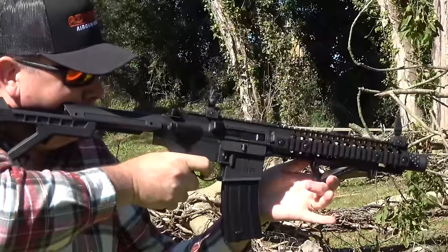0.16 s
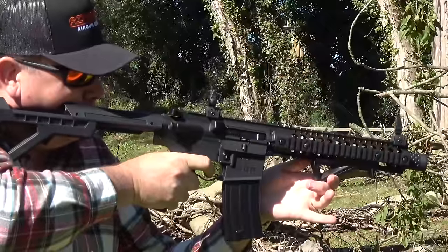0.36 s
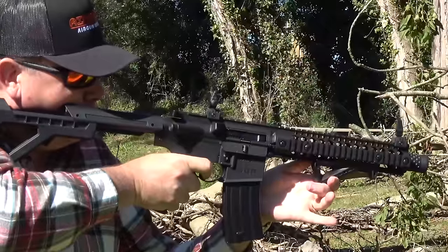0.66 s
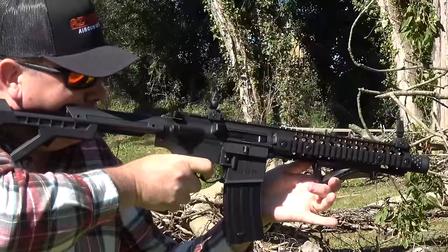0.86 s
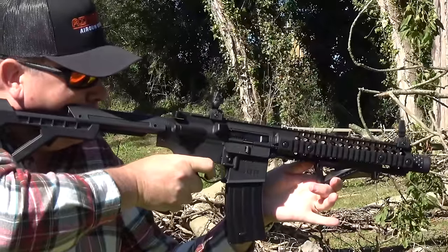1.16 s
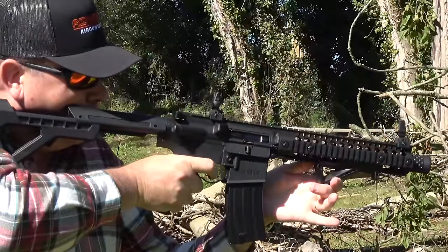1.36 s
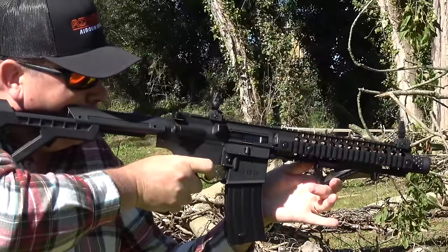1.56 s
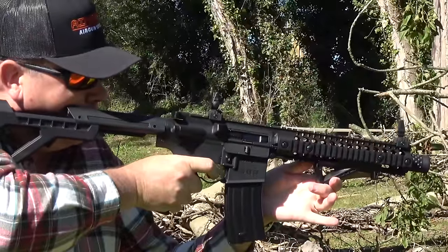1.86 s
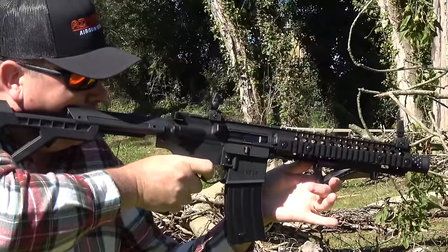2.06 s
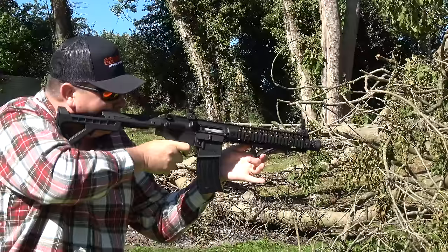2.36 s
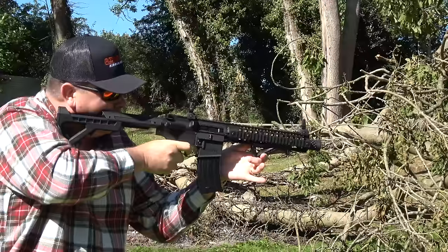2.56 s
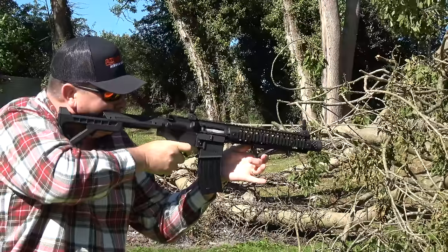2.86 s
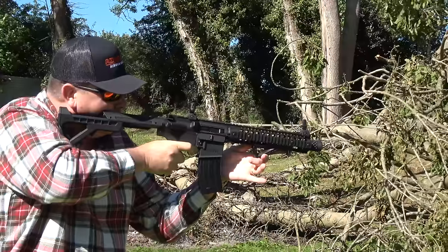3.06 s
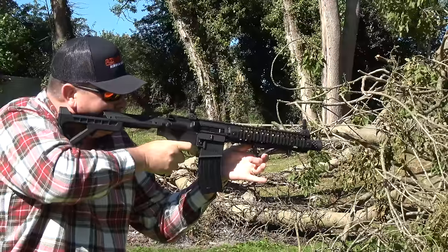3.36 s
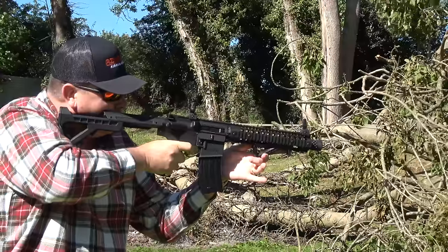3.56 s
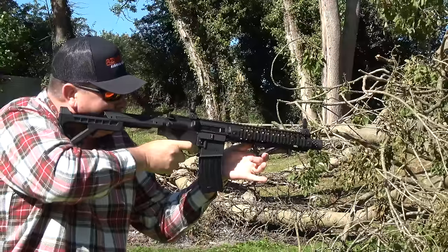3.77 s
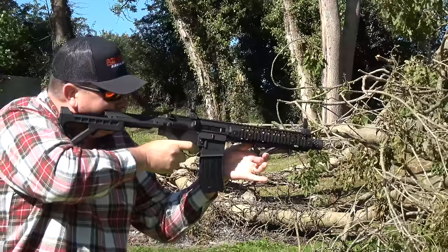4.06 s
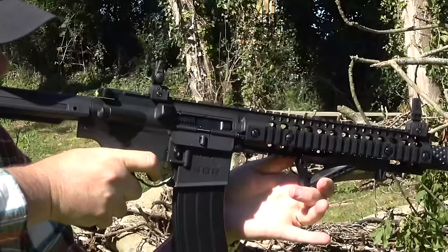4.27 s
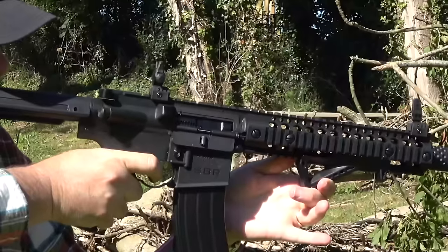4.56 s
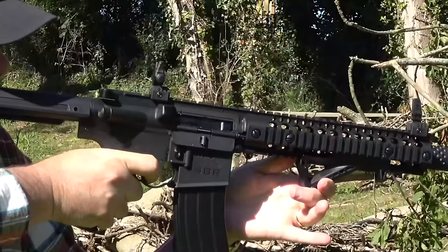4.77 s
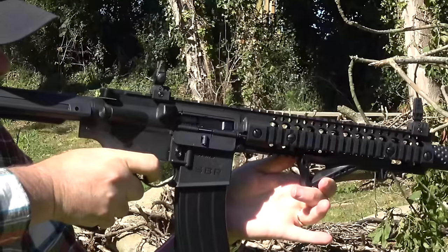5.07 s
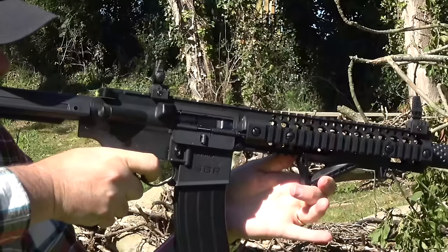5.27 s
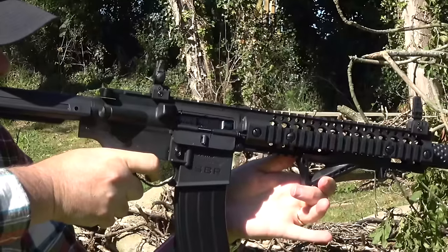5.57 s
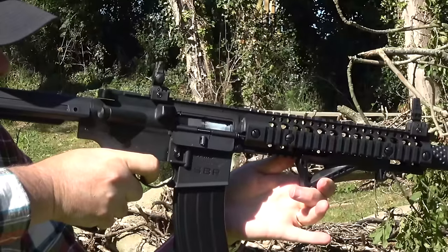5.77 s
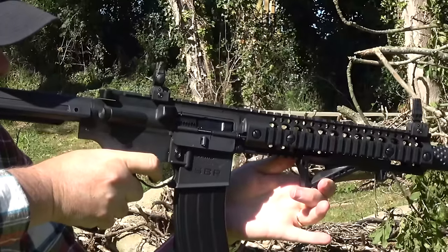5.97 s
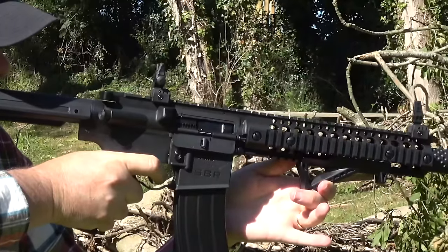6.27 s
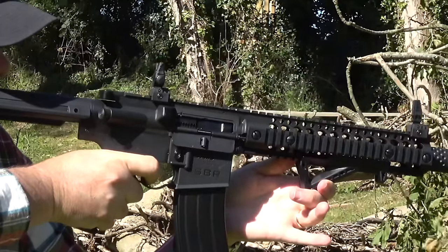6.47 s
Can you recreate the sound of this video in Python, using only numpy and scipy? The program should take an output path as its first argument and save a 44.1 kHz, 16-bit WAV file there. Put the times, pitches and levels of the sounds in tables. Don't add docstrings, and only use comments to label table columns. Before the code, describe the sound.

Twenty rapid semi-automatic shots from a gas-powered pellet rifle outdoors, sharp close cracks with metallic bolt clatter and trigger ticks, over a light breeze.

```python
import sys
import numpy as np
from scipy import signal
from scipy.fft import rfft, irfft, next_fast_len
from scipy.io import wavfile
from scipy.ndimage import uniform_filter1d, map_coordinates

SR = 44100
rng = np.random.default_rng(int(sys.argv[2]) if len(sys.argv) > 2 else 0)


def gain_from_db(level_db):
    decades = np.asarray(level_db, float) / 20
    return 10 ** decades


def persist_wave(psi):
    counts = np.round(np.clip(psi, -1, 1) * 32767).astype(np.int16)
    wavfile.write(sys.argv[1], SR, np.atleast_2d(counts).T)


N = 292383

# [blast t/s, blast level/dB, crack level/dB, spring ring level/dB, barrel ring level/dB]
SHOTS = [(.098, -4, 0, -35, -53), (.6826, -2.5, 3, -34.5, -53.5), (1.0017, -5, -2.5, -36, -42),
         (1.3306, -3.5, .5, -32, -52), (1.7346, -5, -.5, -37, -59.5), (2.1139, -3, 2, -31.5, -56),
         (2.4534, -5.5, 2, -33, -41), (2.717, -3.5, .5, -35, -47), (2.9497, -5, -3, -32.5, -50),
         (3.2942, -5.5, 1.5, -34.5, -57), (3.5987, -4, -3, -40, -44), (3.9672, -2.5, -.5, -33.5, -42.5),
         (4.5087, -6, -5.5, -33.5, -52), (4.8103, -5.5, 2, -35, -42), (5.0767, -6, -2.5, -37, -43),
         (5.3255, -7, -5.5, -42, -45), (5.5723, -8, 0, -40.5, -60), (5.8433, -5, 2, -36, -49.5),
         (6.1555, -7.5, -.5, -38.5, -39.5), (6.5047, -6, -2, -37.5, -36)]


def blast():
    ms = np.arange(SR // 20) / SR * 1000 - 4

    def bump(at, width):
        return np.exp(-((ms - at) / width) ** 2)

    swing = 1.55 * bump(0, 0.39) - 0.66 * bump(-0.51, 0.48) - 0.79 * bump(-1.3, 0.12) - 0.19 * bump(1.92, 0.89)
    shroud_fade = 0.17 * np.exp(-np.maximum(ms - 2.4, 0) / 5.3) * (ms > 2.0)
    shroud = shroud_fade * np.cos(2 * np.pi * (ms - 2.4) / 1.8)
    ground = 0.087 * bump(8.5, 1.2) - .1 * bump(4.0, 0.19)
    trunk_echo = 0.024 * bump(3.3, 2.5) * np.sin(2 * np.pi * 0.705 * ms)
    out = np.zeros(N)
    for s, db, *_ in SHOTS:
        add(out, s - .004, gain_from_db(db + 3.0) * (swing + shroud + ground))
        add(out, s + .1185, gain_from_db(db + 1.5) * trunk_echo)
    return out


def action():
    kinds = contacts()
    blows, struck = clacks(kinds)
    stock = gain_from_db(-15) * uniform_filter1d(blows, size=90, origin=40) * hollow()
    return gain_from_db(-1.8) * struck + loose_buzz(blows) + stock + steel_rings(kinds) + bolt_rings()


# [strike t/s, strike level/dB, knock t/s, knock level/dB, input sag level/dB]
HAMMER = [(0.079, -5, 0.0871, -7, -10), (0.6653, -3, 0.6731, -11, -21.5), (0.9823, -3, 0.9905, -6, -19),
          (1.3117, -4, 1.3202, -7, -17), (1.7162, -3, 1.724, -9, -27), (2.095, -4, 2.1031, -6, -27),
          (2.4333, -3, 2.4414, -6, -19.5), (2.6981, -4, 2.7065, -9, -27), (2.9311, -3, 2.9394, -7, -27),
          (3.2755, -3, 3.2845, -8, -27), (3.58, -3, 3.5883, -9, -27), (3.9485, -3, 3.9555, -9, -17),
          (4.4901, -4, 4.498, -9, -16.5), (4.7906, -4, 4.7987, -5, -27), (5.0577, -3, 5.0654, -9, -16),
          (5.3065, -3, 5.3148, -8, -27), (5.5528, -3, 5.561, -6, -16.5), (5.8244, -4, 5.8327, -9, -27),
          (6.137, -4, 6.1451, -7, -27), (6.4866, -3, 6.4951, -13, -27)]
# [t/s, level/dB, rebound level/dB, input sag level/dB]
BOLT_BACK = [(.1124, -1, -13, -11.5), (.698, .5, -16, -14), (1.0167, -2.5, -9, -10), (1.346, 1.5, -16, -14),
             (1.752, -1, -11, -13), (2.131, 0, -16, -9.5), (2.4688, -5.5, -2.5, -27), (2.7342, -1, -9, -27),
             (2.9681, -7, -16, -27), (3.3117, -6.5, -9, -27), (3.6177, -7, -1.5, -27),
             (3.9889, -7, -14, -27), (4.5205, -11, -14.5, -27), (4.83, -13, -18, -27),
             (5.0937, -10, -13, -27), (5.3422, -10, -8, -27), (5.588, -10.5, -10.5, -22),
             (5.8605, -13, -9.5, -24), (6.1678, -11, -16, -18), (6.526, -9, -13, -24)]
# [slam t/s, slam level/dB, bounce t/s, bounce level/dB, input sag level/dB]
BOLT_HOME = [(.1315, -7, .143, -6, -27), (.7169, -4.5, .7307, -9, -27), (1.0372, -2, 1.0495, -8, -27),
             (1.3659, -3.5, 1.3782, -7, -18.5), (1.7708, -2.5, 1.7829, -8.5, -27),
             (2.1503, -2, 2.1629, -7.5, -27), (2.4912, -3, 2.5025, -10.5, -27),
             (2.756, -3.5, 2.7692, -8, -27), (2.9899, -3.5, 3.0032, -11, -10),
             (3.3332, -2, 3.3473, -7, -12), (3.6386, -1, 3.6533, -13, -8.5), (4.008, -3, 4.0225, -8, -10.5),
             (4.5511, 1, 4.5637, -9.5, -12), (4.8519, .5, 4.8668, -7, -8.5), (5.119, 1, 5.1332, -9, -14.5),
             (5.3675, 2.5, 5.3819, -8.5, -13), (5.6132, 0, 5.6282, -5, -12),
             (5.8844, -1.5, 5.8994, -9, -10), (6.1964, -2, 6.2119, -6.5, -16),
             (6.5464, -2, 6.5615, -6.5, -13)]
# [t/s, level/dB]
LOOSE_PARTS = [(0.1093, -10), (0.1191, -7), (0.1227, -12), (0.6928, -15), (0.7063, -7), (1.0104, -13),
               (1.0238, -11), (1.3528, -9), (1.3562, -12), (1.7439, -13), (1.7471, -15), (1.7621, -13),
               (1.7644, -14), (2.1428, -14), (2.1651, -11), (2.4751, -11), (2.4851, -9), (2.7434, -15),
               (2.7479, -12), (2.7506, -10), (2.9589, -11), (2.9809, -7), (2.9831, -5), (2.9994, -14),
               (3.3032, -13), (3.3266, -9), (3.3308, -10), (3.6087, -15), (3.6301, -12), (3.6359, -11),
               (3.6468, -10), (3.9783, -14), (3.9837, -14), (3.9967, -13), (4.0039, -10), (4.016, -13),
               (4.5311, -15), (4.5336, -15), (4.536, -15), (4.5419, -11), (4.5614, -14), (4.8206, -13),
               (4.8259, -12), (4.8619, -15), (5.0863, -13), (5.1269, -14), (5.1295, -15), (5.3367, -11),
               (5.364, -14), (5.3756, -13), (5.583, -15), (5.6251, -14), (5.6312, -13), (5.8553, -13),
               (6.164, -14), (6.1787, -14), (6.19, -11), (6.2084, -12), (6.5172, -11), (6.5399, -7)]
# [t/s, level/dB]
SEAR_SCRAPES = [(0.0608, -13), (0.6395, -12), (0.6558, -12), (0.9636, -16), (0.967, -9), (0.9711, -10),
                (1.2948, -16), (1.2977, -8), (1.2998, -8), (1.703, -15), (1.707, -8), (1.7093, -13),
                (2.0803, -17), (2.0841, -9), (2.0885, -11), (2.4215, -16), (2.4248, -9), (2.4275, -11),
                (2.6847, -14), (2.6877, -8), (2.6907, -13), (2.9222, -9), (2.9259, -10), (3.2631, -16),
                (3.2667, -9), (3.2692, -10), (3.563, -17), (3.5663, -9), (3.5694, -12), (3.9394, -16),
                (3.9439, -4), (4.4696, -9), (4.4761, -9), (4.7794, -17), (4.783, -8), (4.7863, -12),
                (5.0477, -15), (5.0513, -9), (5.2954, -17), (5.3, -9), (5.541, -18), (5.5443, -9),
                (5.8112, -20), (5.816, -8), (6.1252, -19), (6.1289, -8), (6.4743, -21), (6.4813, -7)]
CHATTER_MS = dict(sear=2.8, strike=1.8, follow=2.4, crack=2.5, ground=1.6, back=3, rebound=2.2, home=4, bounce=3.8, loose=1.8)


def contacts():
    shot, _, crack_db, *_ = np.transpose(SHOTS)
    strike, strike_db, follow, follow_db, _ = np.transpose(HAMMER)
    back, back_db, rebound_db, _ = np.transpose(BOLT_BACK)
    home, home_db, bounce, bounce_db, _ = np.transpose(BOLT_HOME)
    cycle = dict(
        sear=np.transpose(SEAR_SCRAPES),
        strike=(strike, strike_db),
        follow=(follow, follow_db),
        crack=(shot - .0021, crack_db),
        ground=(shot + .0033, -10 + 0 * shot),
        back=(back, back_db),
        rebound=(back + .0042, rebound_db),
        home=(home, home_db),
        bounce=(bounce, bounce_db),
        loose=np.transpose(LOOSE_PARTS))
    return {name: np.c_[s, db, CHATTER_MS[name] + 0 * s] for name, (s, db) in cycle.items()}


# [f/Hz, level/dB over the receiver]
PART_TINTS = dict(sear=[(700, -8), (1500, 0), (4200, 0), (5800, -6), (7500, 1), (9000, -6), (10500, 1),
              (13800, -6)], strike=[(1500, 2), (2100, -4), (3800, 0), (4700, -6), (5400, 0), (6000, -4),
              (7000, 1), (14500, 6)], follow=[(1200, -7), (3000, -6), (4700, 5), (6300, -3), (7000, 3),
              (10000, -8), (14000, -7)], bolt=[(1000, 3), (2500, 1), (5000, -3), (6800, 1), (7500, -3),
              (10000, 1), (15500, 2)], home=[(1500, 0), (2600, -4), (3900, 3), (5500, -1), (6900, 3),
              (13500, 0), (15500, 5)], bounce=[(1000, 0), (2700, -8), (4500, 1), (5900, 3), (8800, -5),
              (9800, 1), (12300, -4)])


def clacks(kinds):
    noise = metal_noise(shell_db=4.5, patchy_db=2.2, grain_db=1.3)
    parts = {name: np.zeros(N) for name in PART_TINTS}
    for name, rows in kinds.items():
        part = name if name in PART_TINTS else "bolt"
        parts[part] += chatter(rows, rise_ms=0.31, fall_ms=0.65, lead_db=-22.5)
    struck = np.zeros(N)
    for name, envelope in parts.items():
        struck += filtered(envelope * noise, lambda f: gain_from_db(along(PART_TINTS[name], f)))
    return sum(parts.values()), struck


def loose_buzz(blows):
    driven = np.zeros(N)
    for (s, *_), (home, *_) in zip(SHOTS, BOLT_HOME):
        add(driven, s - .021, np.ones(round((home - s + .058) * SR)))
    t = np.arange(SR // 4) / SR
    decay = np.exp(-t / 0.0063) / (0.0077 * SR)
    shake = signal.fftconvolve(blows ** 2 * (driven + .05), decay)[:N]
    level = gain_from_db(-10.5) * np.sqrt(np.abs(shake)) * gain_from_db(2.25 * wobble(250))
    return level * metal_noise(shell_db=1, patchy_db=2.5, grain_db=2.0)


# [f/Hz, level/dB, t60/s]
STEEL_MODES = [(5949, -35, 0.061), (6930, -24.5, 0.041)]


def steel_rings(kinds):
    rings = np.zeros(N)
    for s, db, _ in np.concatenate(list(kinds.values())):
        for hz, mode_db, t60 in STEEL_MODES:
            louder, sharper = rng.normal(0, 1, 2)
            tone = ring(hz * (1 + 0.0086 * sharper), t60, .0005)
            add(rings, s, gain_from_db(db + mode_db + 5.3 * louder) * tone)
    for s, db, *_ in HAMMER:
        add(rings, s + .004, gain_from_db(db - 17) * ring(6985, .07, .003))
    return rings


# [t/s, level/dB]
HANDGUARD = [
    (0, -58),
    (4.1, -54),
    (4.3, -42),
]


def bolt_rings():
    t = np.arange(SR // 4) / SR
    squeeze = np.sin(2 * np.pi * np.cumsum(np.minimum(900 + 40000 * t, 1450)) / SR)
    squeeze *= t / .006 * np.exp(1 - t / .006)
    rings = np.zeros(N)
    for (s, *_, spring_db, barrel_db), (home, _, bounce, bounce_db, _) in zip(SHOTS, BOLT_HOME):
        guard_db = np.interp(s, *np.transpose(HANDGUARD))
        kept_db = 60 * np.minimum(t, home + .012 - s) / .12
        add(rings, s + .013, gain_from_db(spring_db + 14 + kept_db - kept_db[-1] / 2) * ring(981, 0.12, 0.0032))
        add(rings, s + .009, gain_from_db(-16) * squeeze)
        add(rings, s + .018, gain_from_db(guard_db + 15) * ring(1760, .08, .003))
        add(rings, home, gain_from_db(guard_db) * ring(1680, .3, .006))
        add(rings, bounce, gain_from_db(barrel_db + 11) * ring(3348, 0.12, .006))
        add(rings, bounce, gain_from_db(bounce_db - 14) * ring(5916, .06, .001))
    return rings


# [slack t/s, slack level/dB, click t/s, wall t/s]
PULLS = [(.56, -39, .548, .5756), (.9144, -29.5, .9294, .94), (1.2234, -45, 1.2494, 1.2636),
         (1.65, -55, 1.661, 1.6766), (1.9983, -42, 2.0298, 2.0477), (2.3702, -40, 2.3854, 2.397),
         (2.6498, -26, 2.6584, 2.6633), (2.884, -30, 2.8925, 2.9), (3.21, -55, 3.2217, 3.2383),
         (3.5212, -36, 3.5319, 3.5395), (3.851, -39, 3.899, 3.9133), (4.4091, -44, 4.399, 4.4228),
         (4.7343, -30, 4.7476, 4.7576), (5.0106, -29, 5.0214, 5.0273), (5.2588, -32, 5.2687, 5.277),
         (5.4977, -38, 5.5102, 5.5187), (5.7727, -35, 5.7827, 5.7907), (6.0734, -39, 6.088, 6.0997),
         (6.4282, -35, 6.441, 6.4517)]
# [wall level/dB, creep delay t/s, creep level/dB]
WALLS = [(-31, .012, -55), (-24, .011, -41), (-22, .016, -46), (-22, .015, -42), (-23, .016, -48),
         (-22, .013, -43), (-24, .01, -35), (-26, .009, -37), (-22, .013, -45), (-24, .011, -37),
         (-21, .014, -38), (-28, .012, -52), (-27, .01, -39), (-25, .01, -34), (-26, .009, -35),
         (-26, .01, -36), (-27, .011, -34), (-26, .013, -44), (-28, .012, -40)]
# [t/s, level/dB, sear ring level/dB]
RESETS = [(.2926, -18, 0), (.8586, -17, -6), (1.1281, -16.5, -3), (1.4687, -17.5, -3), (1.8801, -19.5, -3),
          (2.2538, -18.5, 3), (2.5815, -17, -3), (2.8208, -15, -3), (3.059, -16, -3), (3.4183, -14, 0),
          (3.7174, -14.5, -5), (4.1086, -17, -3), (4.6787, -15.5, -3), (4.9354, -15, -8), (5.2031, -16, -3),
          (5.4428, -15, -3), (5.692, -15.5, -3), (5.9833, -19.5, -3), (6.3051, -20.5, -10)]
# [t/s, level/dB, plastic knock level/dB]
FIDGET = [(.0315, -30, -19), (.0386, -8.5, -24), (.0436, -40, -11), (.0557, -25, -12), (.2566, -34, -14),
          (.4672, -42, -9), (.616, -62, 15), (.7475, -19, -15), (1.3975, -19, -15), (.6342, -36, -6),
          (.8072, -36, -8), (2.238, -31, -9), (2.846, -27, -17), (4.286, -43, -6)]


def trigger():
    slack, slack_db, click, wall = np.transpose(PULLS)
    wall_db, creep_s, creep_db = np.transpose(WALLS)
    reset, reset_db, _ = np.transpose(RESETS)
    click_db = -21 - .5 * 1000 * (wall - click)
    even = 0 * wall
    small = np.r_[np.c_[slack, slack_db, even - 7],
                  np.c_[click, click_db, even - 18],
                  np.c_[wall, wall_db, even - 2],
                  np.c_[wall + creep_s, creep_db, even - 3],
                  FIDGET]
    reset_knock_db = -27
    s, db, knock_db = np.r_[small, np.c_[reset, reset_db, reset_knock_db - reset_db]].T
    hold_ms = np.r_[np.full(len(small), 2.4), 5.5 + 0 * reset]
    ticks = gain_from_db(-5.5) * chatter(np.c_[s, db, hold_ms], rise_ms=.6, fall_ms=1.0, lead_db=-21.5)
    ticks *= metal_noise(shell_db=3.5, patchy_db=1.2, grain_db=1.5)
    settle = np.c_[reset + .011, reset_knock_db - 6.5 + 0 * reset, 3 + 0 * reset]
    knock_rows = np.r_[np.c_[s, db + knock_db, hold_ms], settle]
    knocks = chatter(knock_rows, rise_ms=.8, fall_ms=2.7, lead_db=-25.5) * hollow()
    thin = filtered(ticks + gain_from_db(-2.5) * knocks, lambda f: f ** 4 / (f ** 4 + 780. ** 4))
    return thin + sear_reset()


def sear_reset():
    sear, dip = np.zeros(N), np.zeros(N)
    for s, db, ring_db in RESETS:
        add(sear, s, gain_from_db(db + ring_db - 39) * ring(3990, .45, .004))
        add(sear, s, gain_from_db(db - 28) * ring(981, 0.13, 0.0037))
        add(dip, s + .004, -gain_from_db(db - 16) * np.hanning(round(.022 * SR)))
    return dip + sear * gain_from_db(3 * wobble(30))


# [f/Hz, level/dB per Hz]
RECEIVER = [(290, -28), (500, -5), (858, -6.5), (992, -2), (1310, 0), (2090, -12.5), (3960, -2),
            (4790, -3.5), (7000, -0.5), (8100, -3), (9240, -3), (12400, -3), (16300, -20.5)]
# [f/Hz, width f/Hz, level/dB]
RECEIVER_WALLS = [(4810, 370, -24), (6920, 260, 5.5), (7466, 750, -5.5), (9866, 480, 7), (12350, 300, -1.5)]


def metal_noise(shell_db, patchy_db, grain_db):
    walls = resonant(RECEIVER_WALLS)
    z = signal.stft(rng.standard_normal(N), nperseg=128)[2]
    field = uniform_filter1d(rng.standard_normal(z.shape), 3, 0)
    field = unit(uniform_filter1d(field, 4, 1))
    patchy = signal.istft(z * gain_from_db(patchy_db * field), nperseg=128)[1][:N]
    coloured = filtered(patchy, lambda f: gain_from_db(along(RECEIVER, f)) * (1 + gain_from_db(shell_db) * walls(f)))
    return unit(coloured * gain_from_db(grain_db * wobble(900)))


# [f/Hz, width f/Hz, level/dB]
GRIP = [(866, 320, -3), (1266, 330, -5.5), (1870, 430, -1)]


def hollow():
    return unit(filtered(rng.standard_normal(N), resonant(GRIP)))


def chatter(rows, rise_ms, fall_ms, lead_db):
    ms = np.arange(SR // 40) / SR * 1000 - 6
    scrape = gain_from_db(lead_db) * np.exp(-np.abs(ms) / 2.83)
    rise = 1 - np.exp(-np.maximum(ms, 0) / rise_ms)
    out = np.zeros(N + SR)
    for s, db, hold_ms in rows:
        after = np.maximum(ms - 0.65 * hold_ms, 0)
        add(out, s - .0062, gain_from_db(db) * (rise * np.exp(-after / fall_ms) + scrape))
    return out[:N]


def ring(hz, t60, rise):
    t = np.arange(SR // 4) / SR
    envelope = gain_from_db(-60 * t / t60) * (1 - np.exp(-t / rise)) * (1 - (t / t[-1]) ** 2)
    return envelope * np.sin(2 * np.pi * hz * t)


def thumps(rifle):
    ms = np.arange(SR // 20) / SR * 1000 - 3
    drag = -1.1 * np.exp(np.minimum(ms, 0) / 0.88)
    spring_back = 0.51 * np.exp(-np.maximum(ms, 0) / 3)
    sag = uniform_filter1d(np.where(ms < 0, drag, spring_back), size=24)
    slams = np.r_[np.array(HAMMER)[:, [0, 4]], np.array(BOLT_BACK)[:, [0, 3]], np.array(BOLT_HOME)[:, [0, 4]]]
    out = np.zeros(N)
    for s, db in slams:
        add(out, s + .003 - .0036, gain_from_db(db + 4.65) * sag)
    sway = filtered(np.abs(rifle) ** .7, resonant([(16, 19, 1.5), (44.7, 60, -1.5)]))
    return out + gain_from_db(-6) * sway


# [f/Hz, t60/s, level/dB]
TREES = [(1000, 0.83, -4.5), (2600, 0.95, -17), (4500, 0.96, -12.5), (8300, 0.72, -8.5), (13970, .6, -19)]


def woods():
    out, table = np.zeros(N), np.array(TREES)
    for s, db, *_ in SHOTS:
        hz, t, z = signal.stft(rng.standard_normal(SR), SR, nperseg=256)
        t60 = along(table[:, :2], hz)[:, None]
        fade_db = along(table[:, [0, 2]], hz)[:, None] - 60 * t / t60
        build = 1 - np.exp(-t / .03)
        tail = signal.istft(z * gain_from_db(fade_db) * build, SR, nperseg=256)[1]
        add(out, s - .015, gain_from_db(.5 * db) * tail)
    bands = resonant([(4000, 150, -2), (5900, 200, -3), (8300, 350, 0)])
    return filtered(out * gain_from_db(2.5 * wobble(40)), lambda f: 1 + bands(f))


# [f/Hz, level/dB per Hz]
AIR = [(12, -35), (24, 1), (70, 6), (216, -5.5), (347, -3.5), (513, -9.5), (849, -19), (1400, -25),
       (2020, -38), (5680, -38), (16000, -51)]
# [t/s, level/dB]
PASSING_CARS = [
    (.45, -45.5),
    (4.6, -52),
]
# [t/s, turning f/Hz, second order level/dB, third order level/dB]
ENGINE = [
    (1.1, 146, -68.5, -55),
    (2.85, 144.7, -71, -53),
    (2.95, 135.4, -49, -48),
    (3.5, 138.8, -53, -54),
    (5.6, 141.5, -53, -64),
    (5.7, 146, -69, -57),
]


def background():
    now = np.arange(N) / SR
    breeze = unit(filtered(rng.standard_normal(N), lambda f: gain_from_db(along(AIR, f))))
    air = gain_from_db(-46.5 + 1.6 * wobble(7)) * breeze
    swell = sum(gain_from_db(db) * np.exp(-((now - s) / .3) ** 2) for s, db in PASSING_CARS)
    rumble = resonant([(210, 330, 0)])
    cars = swell * unit(filtered(rng.standard_normal(N), lambda f: rumble(f) ** 3))
    s, *columns = np.transpose(ENGINE)
    hz, second_db, third_db = [np.interp(now, s, c) for c in columns]
    turn = 2 * np.pi * np.cumsum(hz * (1 + 0.003 * wobble(20))) / SR
    second = gain_from_db(second_db + 1.8 * wobble(8)) * np.sin(2 * turn)
    third = gain_from_db(third_db + 1.8 * wobble(12) - 1) * np.sin(3 * turn)
    return air + cars + second + third


def unit(x):
    return x / np.sqrt(np.mean(x ** 2) + 1e-20)


def along(points, hz):
    f, v = np.transpose(points)
    return np.interp(np.log(hz + 1), np.log(f + 1), v)


def filtered(x, response):
    m = next_fast_len(N + SR // 2)
    return irfft(rfft(x, m) * response(np.fft.rfftfreq(m, 1 / SR)), m)[:N]


def resonant(modes):
    def response(f):
        total = 0
        for k, (c, w, db) in enumerate(modes):
            total = total + (-1) ** k * gain_from_db(db) * 1j * f * w / (c * c - f * f + 1j * f * w)
        return total
    return response


def add(track, s, shape):
    part = track[max(round(s * SR), 0):][:len(shape)]
    part += shape[:len(part)]


def wobble(rate):
    knots = rng.standard_normal(int(N * rate / SR) + 4)
    return map_coordinates(knots, [np.arange(N) * rate / SR])


def scene():
    rifle = action() + trigger()
    return (blast() + rifle + thumps(rifle) + gain_from_db(-25.5) * woods() + background())[None]


def roll_off(x):
    return signal.sosfilt(signal.butter(12, 16460, fs=SR, output="sos"), x)


def record(dry):
    coupled = filtered(dry[0], lambda f: 1j * f / (8 + 1j * f))
    clipped = coupled / (1 + np.abs(coupled) ** 20) ** (1 / 20)
    banded = filtered(clipped, lambda f: 1 / (1 + (f / 16100) ** 60) ** 5)
    return roll_off(banded[None])


dry = scene()
out = record(dry)
persist_wave(out)
```